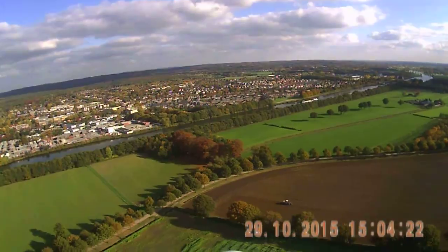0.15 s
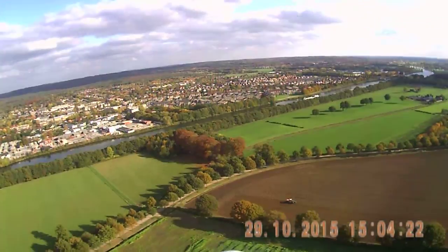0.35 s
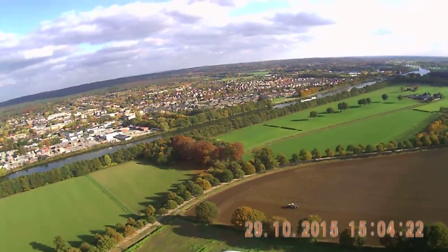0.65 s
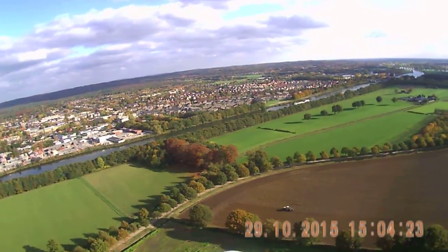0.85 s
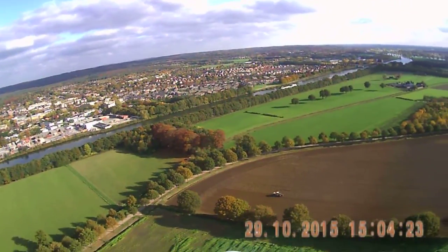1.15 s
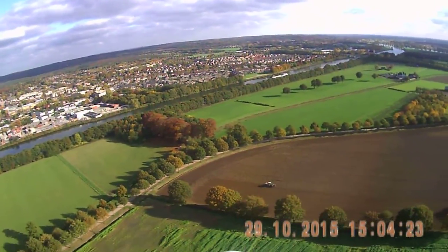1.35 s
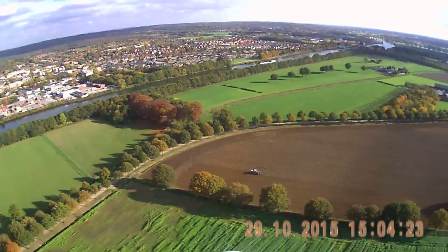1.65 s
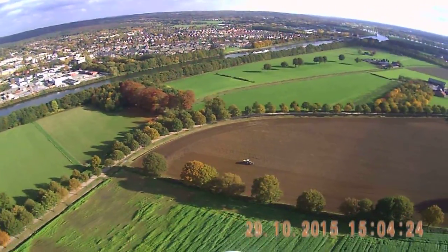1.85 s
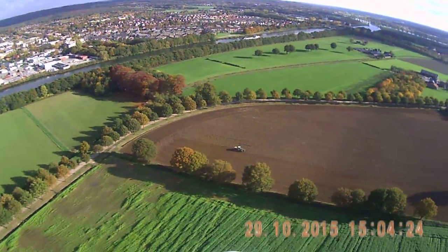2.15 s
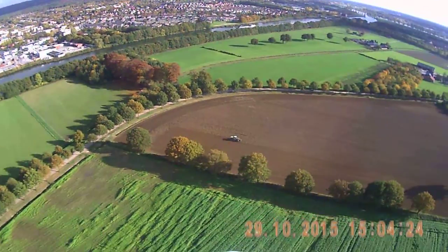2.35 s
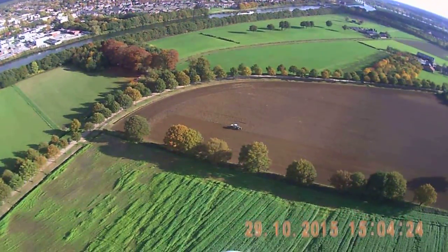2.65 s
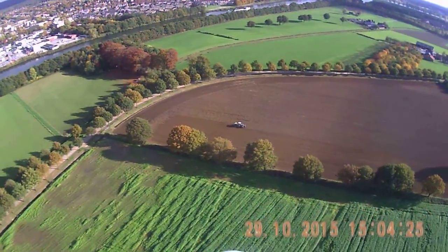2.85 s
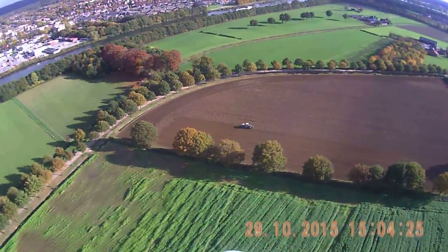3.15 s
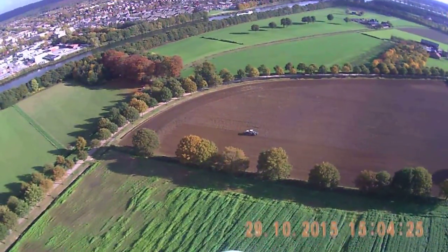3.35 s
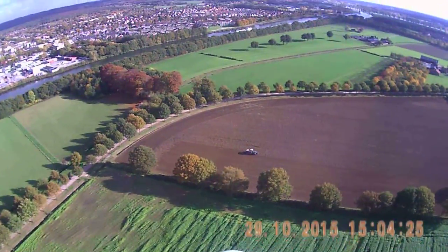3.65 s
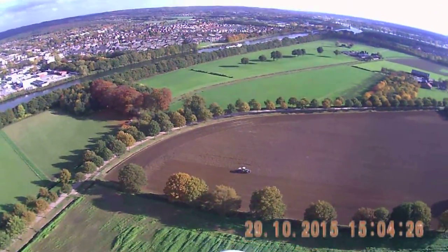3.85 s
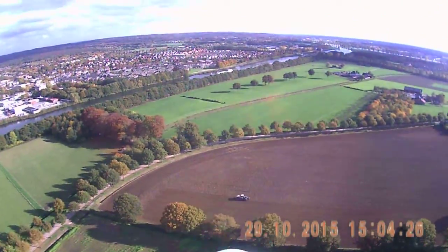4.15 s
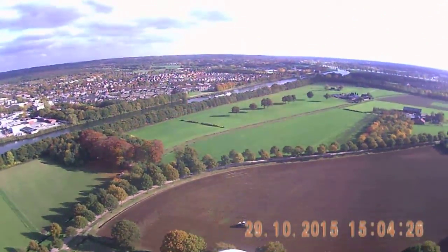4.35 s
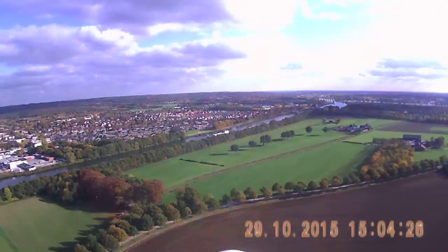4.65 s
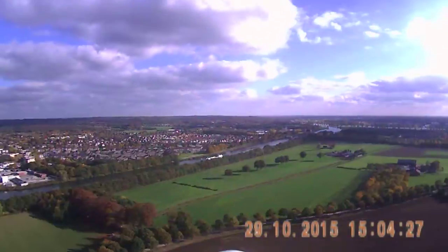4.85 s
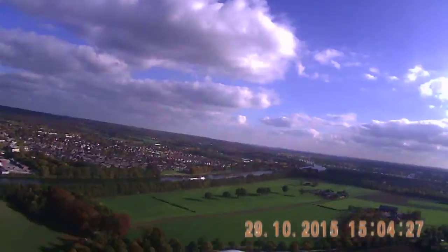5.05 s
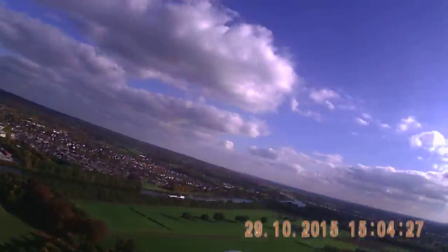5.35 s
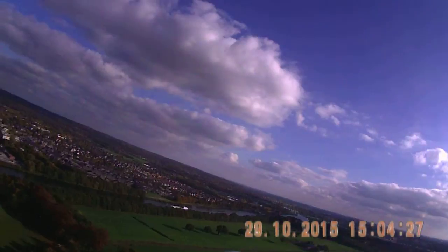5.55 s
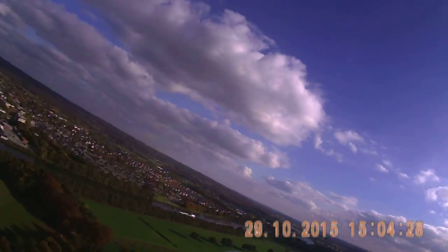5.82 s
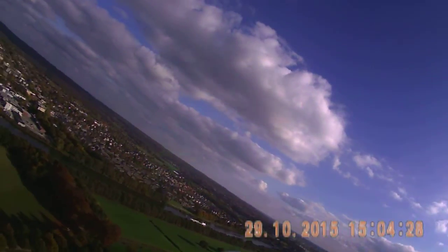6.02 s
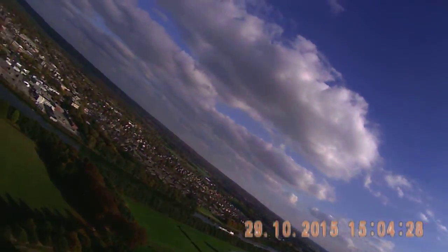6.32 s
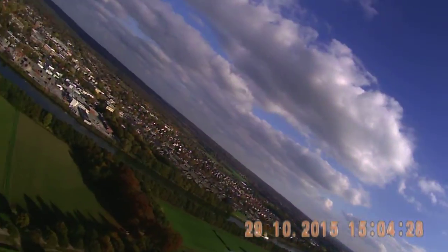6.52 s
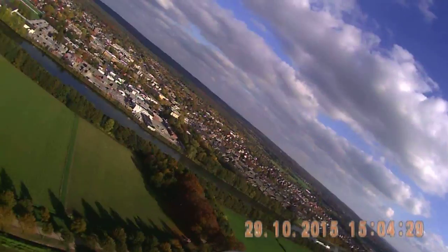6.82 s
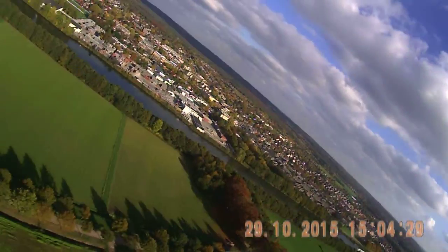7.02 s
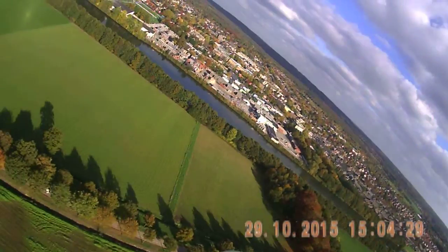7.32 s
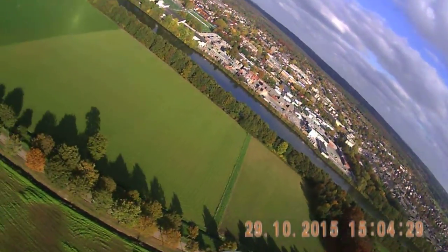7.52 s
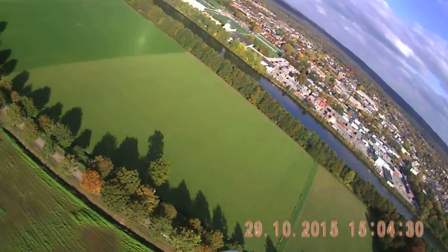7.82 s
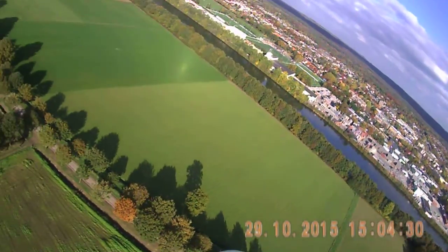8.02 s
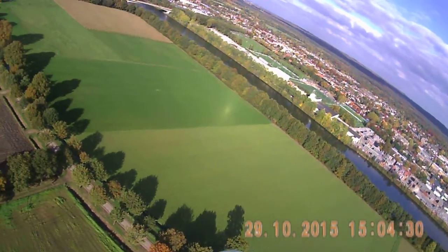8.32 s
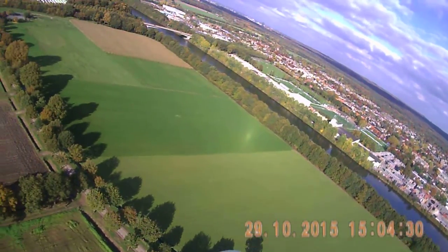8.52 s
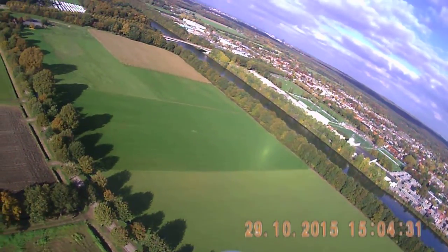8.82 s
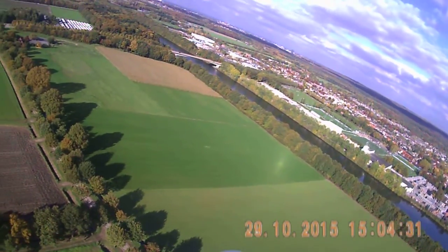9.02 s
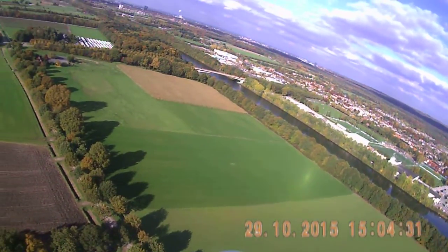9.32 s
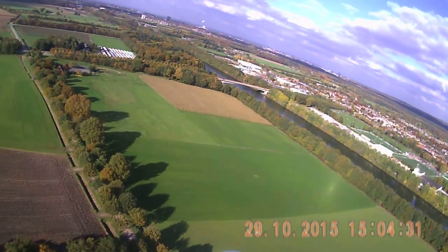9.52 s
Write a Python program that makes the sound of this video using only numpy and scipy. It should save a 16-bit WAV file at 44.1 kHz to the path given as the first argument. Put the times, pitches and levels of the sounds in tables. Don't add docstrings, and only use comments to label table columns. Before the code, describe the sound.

Rough low wind buffets a small microphone on a flying model glider, swelling to crackling overload, easing to a soft rush, then building again.

```python
import sys
import numpy as np
from scipy import signal
from scipy.io import wavfile
from scipy.ndimage import uniform_filter1d, minimum_filter1d

SR = 44100
rng = np.random.default_rng(int(sys.argv[2]) if len(sys.argv) > 2 else 0)


def boost(x):
    u = np.asarray(x, float) / 20
    return 10 ** u


def dump_mix(stems):
    frames = np.atleast_2d(stems).T
    limited = np.clip(frames, -1, 1)
    pcm = np.round(limited * 32767).astype(np.int16)
    wavfile.write(sys.argv[1], SR, pcm)


N = 426888
CAMERA_SR = 8000
FULL_DB = -3.01
FRAME, HOP = 2048, 512
BIN_HZ = np.fft.rfftfreq(FRAME, 1 / SR)[:, None]
FRAME_S = np.arange(N // HOP + 5) * HOP / SR


def evened(x):
    return x / np.sqrt(np.mean(x ** 2) + 1e-20)


def spectrum(points, x):
    at, level_db = np.transpose(points)
    return np.interp(np.log(x + 1e-3), np.log(at), level_db)


def flow(cruise_db, per_buffet_db, per_speed_db):
    # [t/s, buffeting at the port/dB, dynamic pressure of the airspeed/dB]
    flight = [(0, -14.5, -31.5), (1.3, -15, -31), (1.85, -16, -31.5), (2.0, -12.5, -29.5),
              (2.75, -13.5, -26.5), (3.3, -7.5, -23), (4.75, -8.5, -22), (5.2, -12.5, -27),
              (5.331, -16, -25.5), (5.85, -19, -30), (6.3, -21.5, -33), (7.2, -23.5, -35),
              (7.6, -21, -34.5), (7.901, -16.5, -32), (8.65, -12, -29), (9.0, -15, -28.5),
              (9.35, -18.5, -27.5), (9.68, -11.5, -29)]
    s, buffet_db, speed_db = np.transpose(flight)
    buffet_rise = buffet_db + 15
    speed_rise = speed_db + 29
    level_db = cruise_db + per_buffet_db * buffet_rise + per_speed_db * speed_rise
    return np.interp(np.arange(N) / SR, s, level_db)


def puffs(column):
    # [t/s, length/s, lift of the roar/dB, lift of the hiss/dB]
    gusts = [(0.137, 0.045, -0.5, 7), (.7, .1, 1, 4.5), (1.221, 0.066, 3.5, 2), (1.53, 0.065, 5, 0.5),
             (2.062, .03, 1, 4), (2.464, .1, 2, 2), (4.02, 0.028, -1.5, 0.8), (5.183, .06, 1.5, 1.5),
             (5.986, 0.056, 1.5, -1), (6.336, 0.051, -.3, 1.5), (6.982, .06, 4.5, 2), (8.6, .4, 1, 3),
             (9.07, 0.07, 3, .3), (9.174, .1, -1.5, 1), (9.442, 0.07, -2, 0), (9.55, .06, 2, -2.5)]
    t = np.arange(N) / SR
    return sum(row[column] * np.exp(-(2 * (t - row[0]) / row[1]) ** 2) for row in gusts)


def flutter(hz):
    lowpass = signal.butter(2, hz, fs=SR, output="sos")
    return evened(signal.sosfilt(lowpass, rng.standard_normal(N)))


def turbulence(shape_db, patchy_db):
    shape_db = shape_db + np.zeros(len(FRAME_S))
    a, b, patches = rng.standard_normal((shape_db.shape[1], shape_db.shape[0], 3)).T
    patches = uniform_filter1d(patches, size=18, axis=0)
    patches = evened(uniform_filter1d(patches, size=4, axis=1))
    heard = boost(shape_db) * (BIN_HZ < 4200)
    magnitude = heard / np.linalg.norm(heard, axis=0)
    z = (a + 1j * b) * magnitude * boost(patchy_db * patches)
    return evened(signal.istft(z, nperseg=FRAME, noverlap=FRAME - HOP)[1][:N])


def roar():
    # [t/s, centre f/Hz]
    eddy_pitch = [(0, 253), (1.8, 269.6), (2.8, 284), (3.6, 340), (4.8, 344), (5.3, 296.4), (6.4, 233),
                  (7.4, 235), (8.1, 255), (8.7, 300), (9.2, 236.7), (9.68, 315.5)]
    # [f as a multiple of the centre, level/dB]
    roar_shape = [(.15, -29), (.35, -6.5), (.65, -1.5), (1.02, -1), (1.5, -3.5), (2.2, -10), (3.2, -18.5),
                  (6, -34.5)]
    centre_hz = np.interp(FRAME_S, *np.transpose(eddy_pitch))
    air = turbulence(spectrum(roar_shape, BIN_HZ / centre_hz), patchy_db=0.63)
    level_db = flow(cruise_db=-13.5, per_buffet_db=1.124, per_speed_db=.01)
    return air * boost(level_db + puffs(column=2) + 0.25 * flutter(hz=14))


def rumble():
    # [f/Hz, level/dB]
    rumble_shape = [(8, -35.5), (25, -19), (36, -8.5), (50, -0.5), (90, 1.5), (140, -1), (250, -14.5),
                    (500, -27)]
    air = turbulence(spectrum(rumble_shape, BIN_HZ), patchy_db=0.76)
    level_db = flow(cruise_db=-23, per_buffet_db=-0.47, per_speed_db=0.98)
    return air * boost(level_db + 0.49 * flutter(hz=13))


def rush(gust):
    # [f/Hz, level/dB]
    rush_shape = [(250, -21.5), (500, -3.5), (750, -3.5), (1100, -6.5), (1500, -8.5), (2200, -15),
                  (4000, -39)]
    air = turbulence(spectrum(rush_shape, BIN_HZ), patchy_db=-0.8)
    level_db = flow(cruise_db=-21, per_buffet_db=.01, per_speed_db=0.64)
    return air * boost(level_db + 0.54 * puffs(column=3) + 0.45 * gust)


def hiss(gust):
    # [f/Hz, level/dB]
    hiss_shape = [(800, -23), (1300, -14), (1700, -4), (2300, -5.5), (2750, -8), (3300, -8), (3800, -4),
                  (4200, -9)]
    # [f/Hz, width/Hz, level/dB]
    cavities = [(1855, 160, 4), (2355, 420, 5.5), (3720, 170, -5.5)]
    cavity_db = sum(db / (1 + (2 * (BIN_HZ - f) / width) ** 2) for f, width, db in cavities)
    air = turbulence(spectrum(hiss_shape, BIN_HZ) + cavity_db, patchy_db=0.05)
    level_db = flow(cruise_db=-26.5, per_buffet_db=.01, per_speed_db=1.17)
    return air * boost(level_db + puffs(column=3) + 0.46 * gust)


def shed():
    # [start t/s, length/s, typical level over full scale/dB]
    runs = [(1.939, .013, 1), (1.983, .037, -1.5), (2.059, 0, 1), (2.101, 0, .2), (2.15, .01, 0.5),
            (2.228, .016, 0.3), (2.292, .01, 1), (2.361, .035, 0.9), (2.425, .066, 2), (2.517, .027, 1),
            (2.589, 0, .3), (2.636, 0, 3), (2.661, .012, 2.5), (2.715, .029, 1.3), (2.779, .066, 1.8),
            (8.46, 0, 0), (8.499, .018, 0), (8.528, .012, 2.2), (8.564, .022, 2.6), (8.62, .006, 1.2),
            (8.657, .012, 2.8), (8.698, .016, 2.8), (8.756, .028, 2), (8.81, 0, 2), (8.839, 0, .5),
            (8.866, .005, 2.5), (8.913, 0, 2.5), (8.965, 0, 1), (9, 0, .8), (9.0523, 0, 1.5)]
    gap_s = .008
    step = np.arange(9)
    start, length, over_db = np.transpose(runs)[:, :, None]
    place, size = rng.random((len(runs), len(step), 2)).transpose(2, 0, 1)
    lag = gap_s * (step + 0.66 * (place - .5) * (step > 0))
    inside = gap_s * (step - .5) < length
    times = (start + lag)[inside]
    overshoots = (over_db * (0.41 + 1.4 * size))[inside]
    return np.column_stack([times, overshoots])


def slapped(air):
    # [t/s, peak level over full scale/dB]
    slaps = [(0.5273, 2), (0.6345, 2), (0.6898, 6.1), (0.6962, 1.5), (0.7099, 2.5), (0.7441, 3.2),
             (1.0598, 2), (1.1456, 4), (1.1619, -1.5), (1.2127, 2), (1.2318, 2.6), (1.2955, 1.8),
             (1.315, 1.5), (1.4103, -2), (1.521, 3), (1.5354, 3), (1.5424, 2.5), (1.5712, -0.2),
             (1.7164, 2.2), (8.3598, -0.4), (8.387, -1), (5.468, 3), (5.5237, 2), (8.0312, 1.5),
             (8.4312, 3.5), (9.1589, 0), (9.1824, 2), (9.3535, -1.5), (0.126, 1.7), (9.5164, 0.3)]
    # [from t/s, to t/s]
    strong_air = [
        (2.82, 5.285),
        (9.53, 9.7),
    ]
    t = np.arange(N) / SR
    crest = -minimum_filter1d(-abs(air), size=265)
    held = uniform_filter1d(np.minimum(boost(FULL_DB - 1.15) / crest, 1), size=133)
    strong = sum((t > a) & (t < b) for a, b in strong_air)
    air = air * np.where(strong, 1, held)

    s, over_db = np.concatenate([slaps, shed()]).T
    over_db = np.clip(over_db + .8, .5, 4.5)
    over_db = np.append(over_db, -2.7)
    near = np.round(s * SR).astype(int)[:, None] + np.arange(-60, 60)
    crest_at = near[np.arange(len(s)), abs(air[near]).argmax(axis=1)]
    at = np.append(crest_at, N - 1)
    pushes = np.zeros(N)
    pushes[at] = np.sign(air[at]) * boost(FULL_DB + over_db) - air[at]
    lag = np.arange(-160, 161)
    swing = np.cos(2 * np.pi * 330 * lag / SR) * np.hanning(len(lag))
    return air + np.convolve(pushes, swing, "same")


def scene():
    gust = flutter(hz=40)
    return slapped(roar() + rumble() + rush(gust) + hiss(gust))[None]


def top_cut(x):
    return signal.sosfilt(signal.butter(12, 15860, fs=SR, output="sos"), x)


def record(dry):
    full = boost(FULL_DB)
    up, down = 441, 80
    guard = signal.firwin(64 * up + 1, CAMERA_SR / 2, window=("kaiser", 8), fs=SR * down)
    slow = signal.resample_poly(dry, down, up, axis=1, window=guard, padtype="edge")
    slow = np.clip(slow, -full, full)
    smooth = signal.firwin(32 * up + 1, CAMERA_SR / 2, window=("kaiser", 9), fs=SR * down)
    fast = signal.resample_poly(slow, up, down, axis=1, window=smooth, padtype="edge")[:, :N]
    knee, bend = boost(-1.6), .5
    fast = fast * (1 - bend * np.maximum(abs(fast) / full - knee, 0) ** 2)
    ceiling = full * (1 - bend * (1 - knee) ** 2)
    return top_cut(np.clip(fast, -ceiling, ceiling))


dry = scene()
out = record(dry)
dump_mix(out)
```